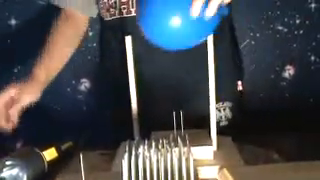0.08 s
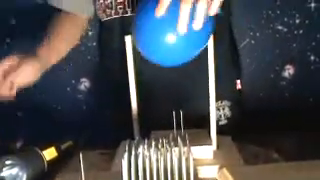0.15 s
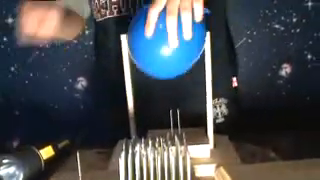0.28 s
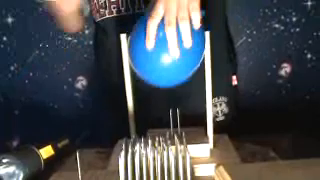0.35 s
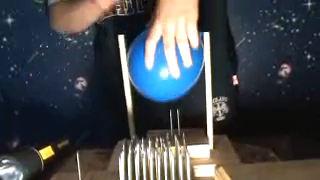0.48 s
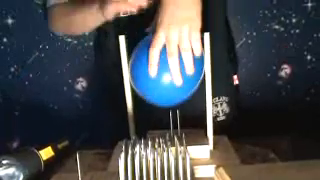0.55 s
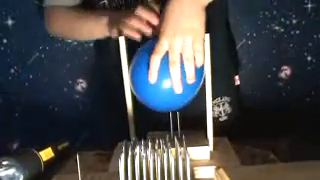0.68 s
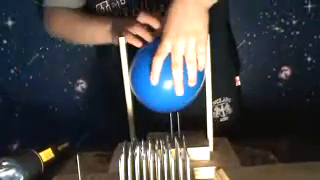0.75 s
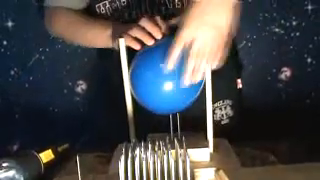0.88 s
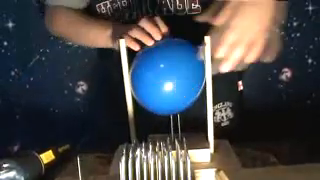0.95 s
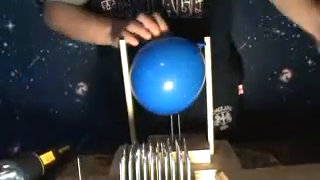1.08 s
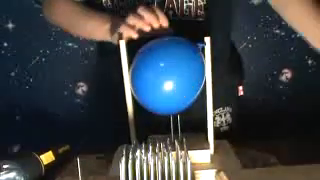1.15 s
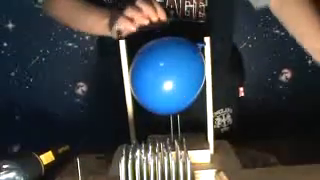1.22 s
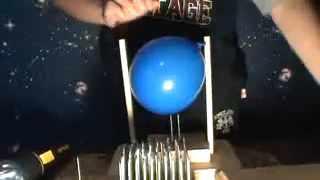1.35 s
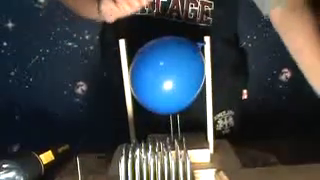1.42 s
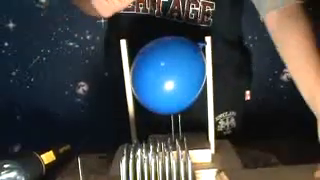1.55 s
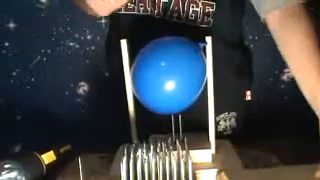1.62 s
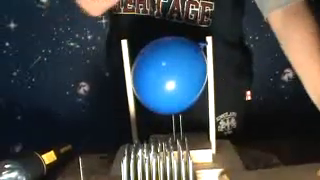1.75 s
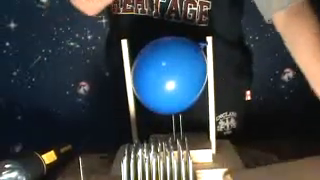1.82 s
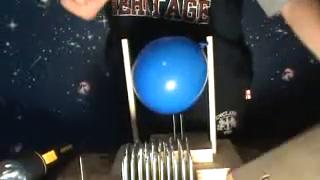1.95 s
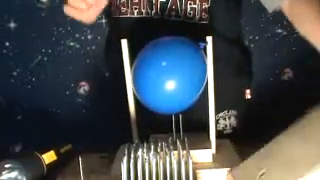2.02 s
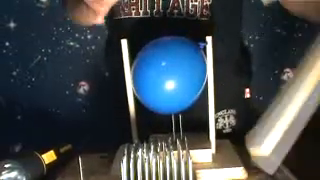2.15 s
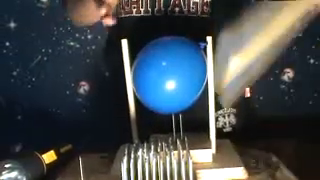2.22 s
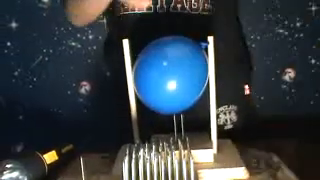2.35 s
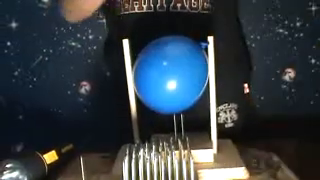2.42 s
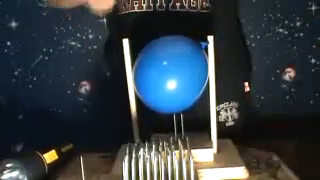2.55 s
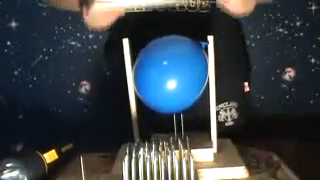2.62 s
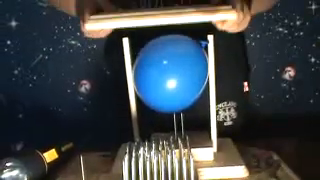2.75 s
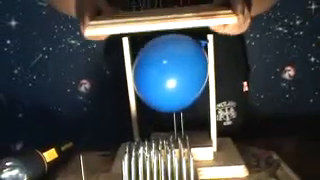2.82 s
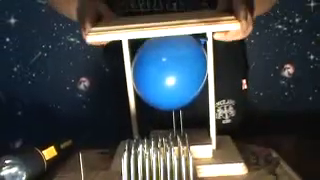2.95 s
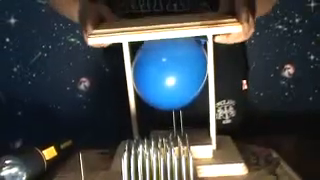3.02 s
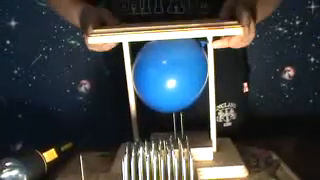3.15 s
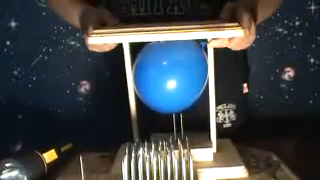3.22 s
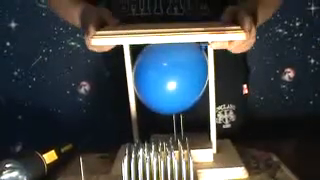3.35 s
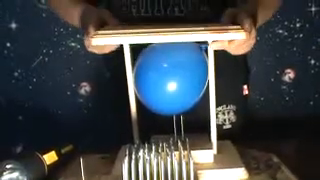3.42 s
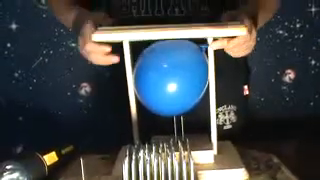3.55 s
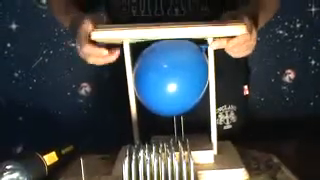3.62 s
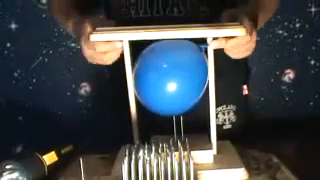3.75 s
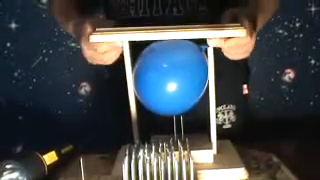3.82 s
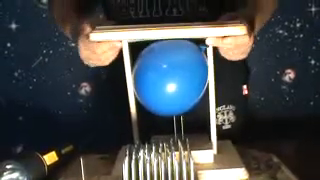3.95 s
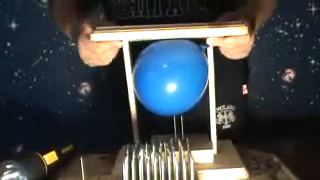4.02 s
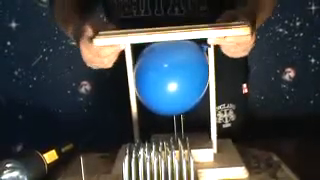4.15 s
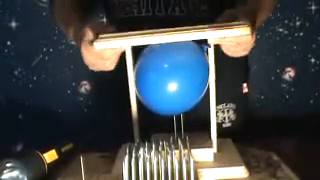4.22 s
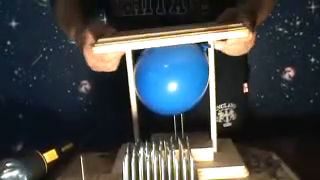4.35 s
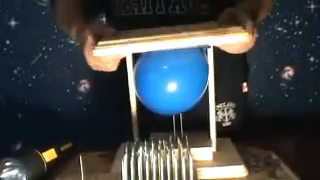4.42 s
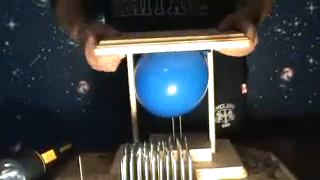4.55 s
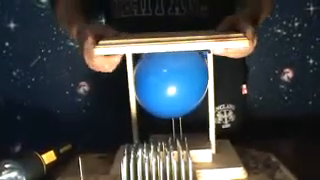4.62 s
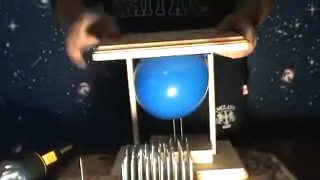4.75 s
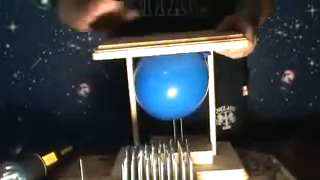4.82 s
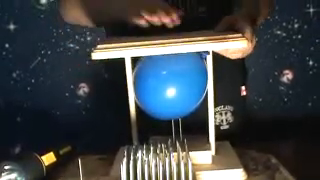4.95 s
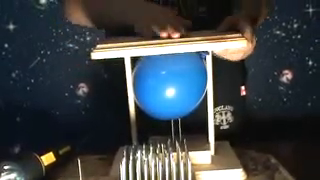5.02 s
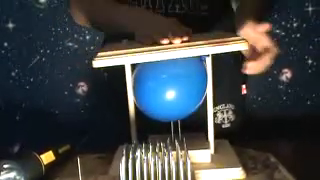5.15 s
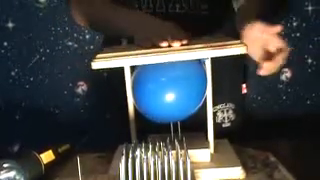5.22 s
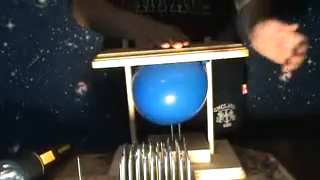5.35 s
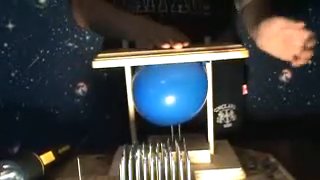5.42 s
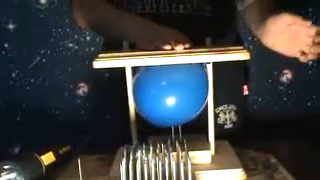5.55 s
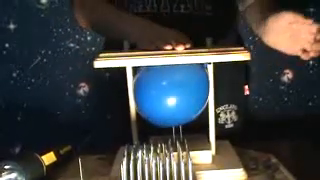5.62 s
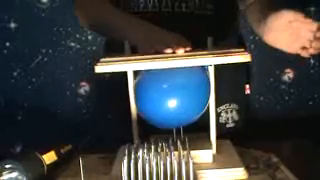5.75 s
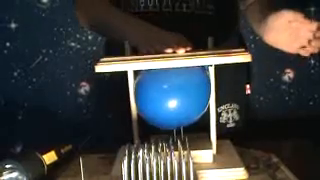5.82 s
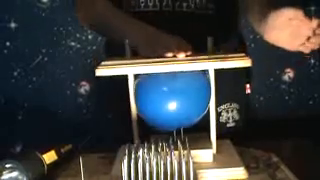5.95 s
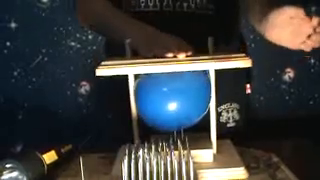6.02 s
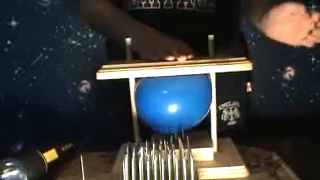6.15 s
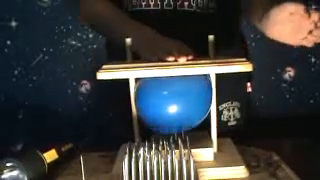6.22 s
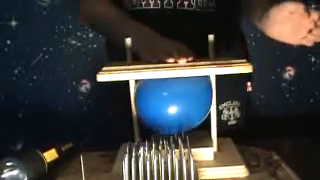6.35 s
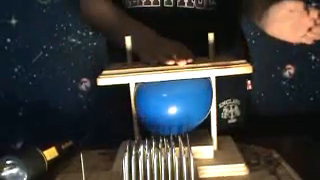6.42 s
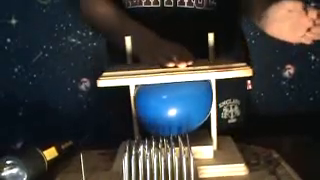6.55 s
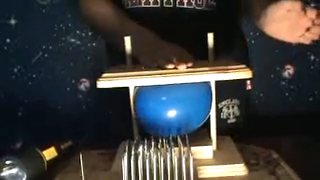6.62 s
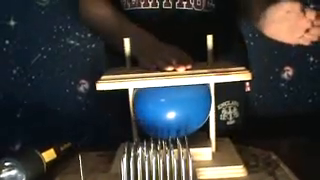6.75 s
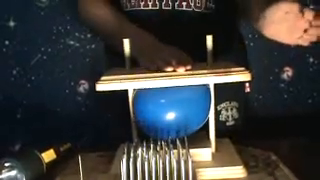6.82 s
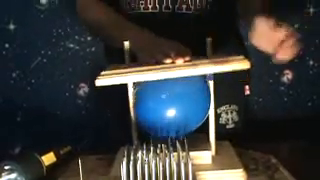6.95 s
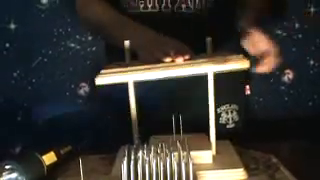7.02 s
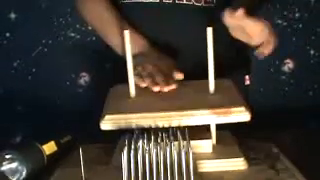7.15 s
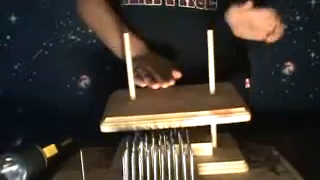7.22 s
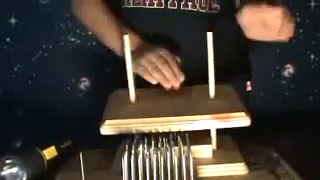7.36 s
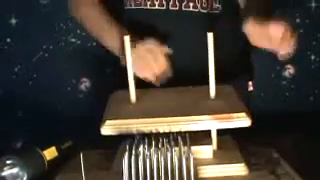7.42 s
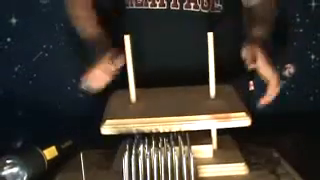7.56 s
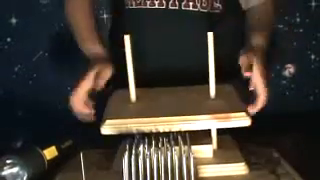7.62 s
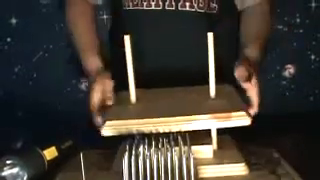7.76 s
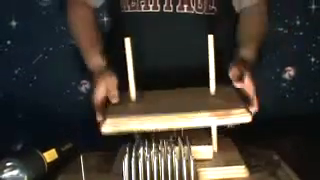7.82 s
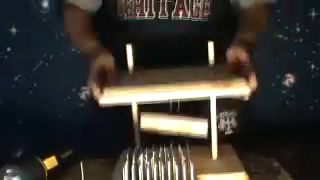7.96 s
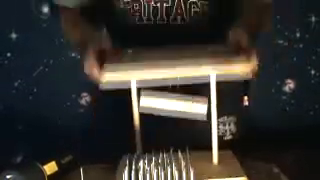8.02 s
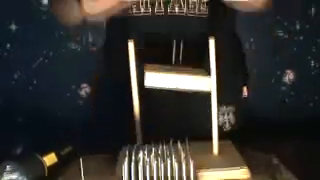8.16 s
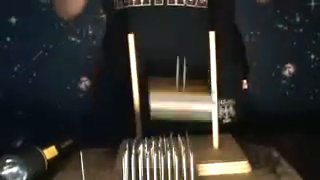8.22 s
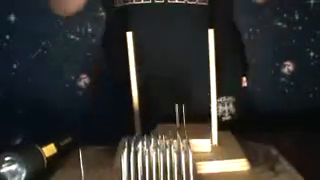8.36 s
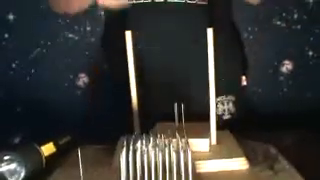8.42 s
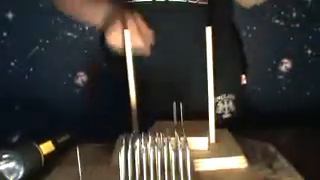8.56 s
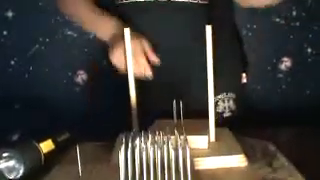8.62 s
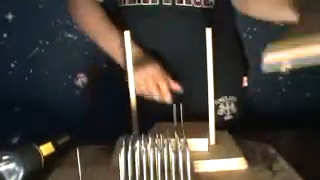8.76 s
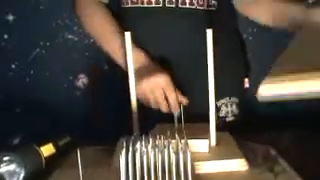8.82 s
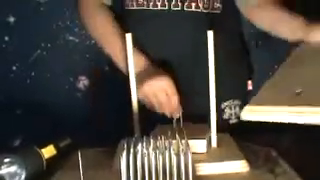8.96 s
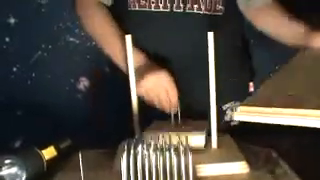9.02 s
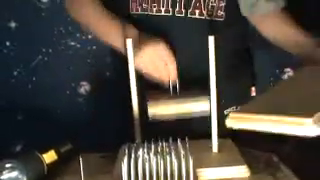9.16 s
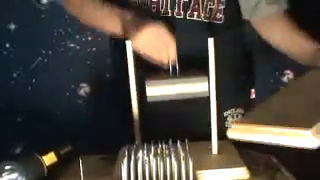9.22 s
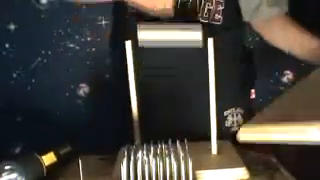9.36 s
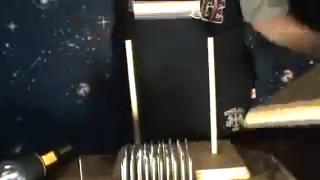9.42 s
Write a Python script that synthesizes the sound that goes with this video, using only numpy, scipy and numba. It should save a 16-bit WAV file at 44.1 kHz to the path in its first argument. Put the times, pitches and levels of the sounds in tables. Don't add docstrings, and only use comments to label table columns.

```python
import sys
import numpy as np
from scipy import signal
from scipy.fft import rfft, irfft, next_fast_len
from scipy.io import wavfile
from scipy.ndimage import uniform_filter1d, minimum_filter1d, map_coordinates
from numba import njit

SR = 44100
rng = np.random.default_rng(int(sys.argv[2]) if len(sys.argv) > 2 else 0)


def generate_wav(signal):
    frames = np.transpose(np.atleast_2d(signal))
    scaled = np.clip(frames, -1, 1) * 32767
    pcm = np.round(scaled).astype(np.int16)
    wavfile.write(sys.argv[1], SR, pcm)


def ratio_of_db(decibels):
    return 10 ** (np.asarray(decibels, float) / 20)


N = 418509

# (onset dB/s, release dB/s)
FINGER, DRAG, GROPE, CRASH = (980, 230), (790, 600), (110, 156), (12000, 1400)
SNAG = (5000, 880)
SING_EDGES = (2500, 700)


def unit(x):
    return x / np.sqrt(np.mean(x ** 2) + 1e-20)


def along(points, hz):
    f, v = np.transpose(points)
    return np.interp(np.log(hz + 1), np.log(f + 1), v)


def filtered(x, response):
    n = x.shape[-1]
    m = next_fast_len(n + 8192)
    return irfft(rfft(x, m) * response(np.fft.rfftfreq(m, 1 / SR)), m)[..., :n]


def colour(x, spectrum):
    return unit(filtered(x, lambda hz: ratio_of_db(along(spectrum, hz))))


def resonance(hz, centre, width):
    return 1j * hz * width / (centre * centre - hz * hz + 1j * hz * width)


def pair(n, spectrum, alike):
    def shape(hz):
        turn = np.arccos(np.clip(along(alike, hz), -1, 1)) / 2
        return ratio_of_db(along(spectrum, hz)) * [np.cos(turn), np.sin(turn)]
    mid, side = filtered(rng.standard_normal((2, n)), shape)
    return unit(np.array([mid + side, mid - side]))


def gritty(rate, depth_db):
    knots = rng.standard_normal(int(N * rate / SR) + 4)
    swing_db = depth_db * map_coordinates(knots, [np.arange(N) * rate / SR])
    return unit(rng.standard_normal(N) * ratio_of_db(swing_db))


# frequency in Hz, time to fall by 60 dB in seconds.
ROOM = [(60, 0.46), (200, 0.33), (600, 0.46), (3000, 0.4), (8000, 0.36), (14000, 0.19)]
# frequency in Hz, likeness from 0 to 1.
ALIKE = [(60, 1), (300, 0.85), (1400, 0.64)]


def room(x, wet_db):
    hz, t, z = signal.stft(pair(SR * 3 // 4, [(30, 0)], ALIKE), SR, nperseg=256)
    decay = ratio_of_db(-60 * t / along(ROOM, hz)[:, None])
    tail = signal.istft(z * decay, SR, nperseg=256)[1]
    tail *= 1 - np.exp(-np.arange(tail.shape[1]) / SR / 0.00099)
    tail *= ratio_of_db(wet_db) / np.linalg.norm(tail[0])
    tail[:, 0] += 1
    return signal.fftconvolve(x[None], tail, axes=1)


def add(out, s, x):
    part = out[:, round(s * SR):][:, :x.shape[1]]
    part += x[:, :part.shape[1]]


def ring(hz, t60, attack):
    t = np.arange(SR // 3) / SR
    return np.sin(2 * np.pi * hz * t) * ratio_of_db(-60 * t / t60) * (1 - np.exp(-t / attack))


def puff(spectrum, length):
    t = np.arange(SR // 3) / SR
    noise = colour(rng.standard_normal(len(t)), spectrum)
    return noise * np.exp(-t / length) * (1 - np.exp(-t / 0.00079))


def chirp(hz):
    return ring(hz, .018, .0006)


def strokes(rows, hand):
    t, out = np.arange(N) / SR, 0
    onset, release = hand
    for s, length, swell_db, *dbs in rows:
        shape = swell_db * (np.clip((t - s) / length, 0, 1) - 1) - onset * np.maximum(s - t, 0)
        shape = shape - release * np.maximum(t - s - length, 0)
        out = out + ratio_of_db(np.c_[dbs]) * ratio_of_db(shape)
    return out


# frequency in Hz, level in dB.
CLICK = [(1500, -120), (2000, 6), (4000, -2.5), (8000, 0.5), (12000, -14), (16000, -6)]


def knocks(events, body, click_s, wet_db):
    out = np.zeros((2, N))
    for s, db, click_db, *shape in events:
        hit = body(s, click_db, *shape) + ratio_of_db(click_db) * puff(CLICK, click_s)
        add(out, s, room(ratio_of_db(db) * hit, wet_db))
    return out


def struck(spectrum):
    cep = irfft(np.log(ratio_of_db(along(spectrum, np.fft.rfftfreq(8192, 1 / SR))) + 1e-4))
    cep[1:4096] *= 2
    cep[4097:] = 0
    pulse = irfft(np.exp(rfft(cep)))[:4096]
    return pulse / np.linalg.norm(pulse)


def blasts(blows, tone):
    out = np.zeros((2, N))
    for s, db in blows:
        add(out, s, room(ratio_of_db(db - 18) * struck(tone), wet_db=18))
    return out


def wood_on_wood(rows, hand, spectrum, peaks):
    def board(hz):
        total = 0
        for k, (centre, width, db) in enumerate(peaks):
            total = total + (-1) ** k * ratio_of_db(db) * resonance(hz, centre, width)
        return total
    hiss, tone = strokes(rows, hand)
    grit = gritty(300, depth_db=2.6)
    return hiss * colour(grit, spectrum) + tone * unit(filtered(grit, board))


# frequency in Hz, level in dB per Hz.
HISS = [(22, -30), (36, -1.5), (50, 4), (70, -2), (181, -6), (227, -5.5), (284, -9), (397, -3.5),
        (524, -11), (843, -6.5), (942, -10.5), (2180, -9.5), (2500, -8.5), (5780, -13.5), (10400, -21),
        (15800, -24.5)]
# frequency in Hz, likeness from 0 to 1.
HISS_ALIKE = [(40, 1), (300, 0.83), (1500, 0.044)]
# frequency in Hz, level in dB rms.
WHINE = [(15680, -83)]


def hiss_and_whine():
    (hz, db), = WHINE
    narrow = [(hz - 150, -60), (hz - 60, 0), (hz + 60, 0), (hz + 150, -60)]
    return ratio_of_db(db) * pair(N, narrow, [(hz, 1)]) + ratio_of_db(-57) * pair(N, HISS, HISS_ALIKE)


# start in seconds, length in seconds, swell in dB,
# body level at the end in dB, squeak level at the end in dB.
RUB = [(0.0, 0.0088, 2.5, -50.5, -53), (.03, 0.17, 9.5, -49, -62), (.3, 0.029, -3.5, -54.5, -70.5),
       (.59, 0.04, -4, -56.5, -57.5), (.645, 0.094, 0, -48, -57.5), (.745, 0.27, 7.5, -45, -62.5),
       (1.06, 0.082, 12, -54, -62.5), (1.272, 0.015, -2.5, -49, -46)]
# frequency in Hz, level in dB per Hz.
SKIN = [(35, -29), (60, -10), (286, -3.5), (435, -8.5), (559, -5), (776, -11.5), (1400, -18), (2110, -25.5),
        (2500, -26.5), (3250, -26), (5500, -120)]
# frequency in Hz, level in dB per Hz.
GRAIN = [(1060, -39), (1800, -3.5), (2170, -10.5), (2400, -6), (3090, -5), (3440, -3), (6130, -13),
         (7820, -7), (8710, -15.5), (15500, -30)]


def rubbing():
    body, squeak = strokes(RUB, FINGER)
    return body * colour(gritty(60, depth_db=2), SKIN) + squeak * colour(gritty(200, depth_db=3), GRAIN)


# start in seconds, peak in dB, click in dB, low tone in dB, pitch in Hz.
TAPS = [(0.348, -27.5, -17.5, -31, 250), (0.411, -28, -15.5, -17, 230), (.443, -36.5, -25, -16, 210),
        (0.55, -26.5, -15.5, -44, 250), (0.656, -36.5, -23, -12, 556), (0.789, -39, -10, -10, 190),
        (1.011, -28.5, -26.5, -24, 561), (1.119, -41.5, 1.5, -22, 700), (1.167, -32.5, -24, -35, 212),
        (1.27, -35, -4, -31, 567)]


def tap(s, click_db, low_db, hz):
    skin = .5 * ring(hz, 0.085, 0.002) + .2 * ring(2.1 * hz, 0.038, 0.0013)
    air = ratio_of_db(low_db + 6.5) * ring(154, 0.052, 0.0013)
    return skin + air + ratio_of_db(-9.0) * puff(SKIN, 0.014)


# start in seconds, length in seconds, swell in dB,
# level in dB, pitch in Hz.
SINGS = [(2.31, .015, -4, -60, 750), (1.954, .028, -9, -50, 1260), (2.05, .1, -1, -64, 3450),
         (2.05, .07, -6, -61, 4650), (2.055, .075, 5, -54, 6900), (2.057, .05, 0, -53, 7900),
         (2.19, .04, -2, -54, 6900), (2.2, .04, -2, -53, 7900), (2.216, .055, 9, -53, 3450),
         (2.215, .07, 0, -57, 1610), (2.255, .015, 1, -52, 2200), (2.25, .053, 6, -55, 1220),
         (2.257, .035, 0, -56, 545), (2.115, .03, 0, -61, 1180), (1.955, .03, -6, -54, 1410),
         (1.953, .04, -8, -49, 495), (4.65, .065, 4, -67, 4150), (8.13, .07, 0, -61, 393),
         (8.172, .045, -1, -51, 2310), (8.222, .033, 8, -47, 2260), (8.229, .045, 0, -46, 760),
         (8.245, .025, -1, -49, 1230), (8.28, .02, -2, -47, 520), (8.28, .025, 4, -45, 1370),
         (8.278, .028, 5, -45, 1170), (8.222, .073, 1, -55, 4250), (8.16, .05, 2, -60, 6700),
         (8.29, .015, 3, -49, 2650), (8.462, .012, 0, -51, 1150), (8.462, .012, 0, -51, 4300),
         (8.462, .006, 0, -54, 300), (8.31, .02, -2, -48, 127), (.7, .055, 2, -53, 570),
         (3.85, .11, 3, -58, 130), (5.315, .025, 0, -58, 1190), (6.13, .045, -3, -55, 250),
         (6.525, .05, -4, -55, 270)]


def singing():
    out = np.zeros((1, N))
    for s, length, swell_db, db, hz in SINGS:
        start = round((s - .05) * SR)
        noise, width = rng.standard_normal(SR // 2), hz / 32
        tone = unit(filtered(noise, lambda f: resonance(f, hz, width)))
        tone = unit(tone + 1.1 * np.sin(2 * np.pi * hz * np.arange(len(tone)) / SR))
        here = slice(start, start + len(tone))
        out[0, here] += strokes([(s, length, swell_db, db)], SING_EDGES)[0, here] * tone
    return out[0]


# start in seconds, length in seconds, swell in dB,
# body level in dB, squeak level in dB.
WEDGE = [(.98, 0.03, -2, -40, -47), (1.011, 0.026, -1, -37, -53)]
# frequency in Hz, level in dB per Hz.
WEDGED = [(47, -42.5), (80, -17), (363, -9), (419, -13), (610, 1.5), (1050, -18), (1390, -12.5),
          (2500, -22.5), (3250, -34), (5500, -120)]


def wedging():
    body, squeak = strokes(WEDGE, SNAG)
    skin = body * colour(gritty(100, depth_db=-2.5), WEDGED)
    return skin + squeak * colour(gritty(300, depth_db=5.5), GRAIN)


# start in seconds, peak in dB, click in dB, pitch in Hz, click pitch in Hz.
TICKS = [(1.617, -57.5, 10, 670, 2760), (1.858, -49.5, -4.5, 980, 1970), (1.952, -41.5, -2.5, 500, 2080),
         (1.973, -44.5, -13, 460, 3480), (2.579, -48.5, 1, 1190, 3600), (3.148, -59.5, 11, 766, 4160),
         (5.27, -56, 6.5, 1190, 2160), (7.818, -52, 5.5, 384, 3740), (8.122, -47.5, -41, 398, 4100)]
# frequency in Hz, level in dB per Hz.
KNOCK = [(88, -41.5), (150, -2.5), (266, 0.5), (378, -5.5), (530, -1.5), (753, -9), (1030, -8.5),
         (1640, -18), (5000, -31), (6500, -105), (11000, -120)]


def tick(s, click_db, hz, click_hz):
    bending = 0.67 * ring(hz, 0.076, 0.00041) + 0.45 * ring(2.6 * hz, 0.018, 0.00042)
    body = bending + ratio_of_db(-4.5) * puff(KNOCK, 0.02)
    return body + ratio_of_db(-33) * ring(206, 0.13, .001) + ratio_of_db(click_db + 5.0) * chirp(click_hz)


# start in seconds, length in seconds, swell in dB, hiss in dB, board tone in dB.
SLIDE = [(1.975, 0.017, -7, -49.5, -52.5), (2.0, 0.032, 3, -52, -65), (2.045, 0.084, 0, -51.5, -62.5),
         (2.14, 0.033, 2, -52, -66), (2.19, 0.068, 7, -42, -52), (2.28, 0.013, -5, -52, -59),
         (2.56, 0.037, 13, -51.5, -61), (2.6, 0.082, -15.5, -58, -64.5), (2.71, 0.045, -3, -58.5, -61.5),
         (3.13, 0.018, 13, -53, -61), (3.18, 0.045, 4, -72, -73), (4.64, 0.052, 0, -58, -62.5),
         (5.26, 0.071, 4.5, -55.5, -58), (7.09, 0.1, 6, -48.5, -49)]
# frequency in Hz, width in Hz, level in dB.
PLANK = [(511, 31, -2.5), (726, 26, -2), (1148, 220, -3.5), (1384, 64, -10.5), (2190, 70, -7.5)]


def sliding():
    return wood_on_wood(SLIDE, DRAG, GRAIN, PLANK)


# start in seconds, peak in dB, click in dB, pitch in Hz.
BUMPS = [(3.248, -39.5, -38, 223), (3.526, -42.5, -13, 137), (3.869, -56, -8, 130), (4.0, -42, -10, 143),
         (4.018, -41.5, -11, 217), (4.122, -47.5, -7.5, 90), (4.238, -40, -12.5, 190),
         (4.326, -40, -11, 110), (4.535, -58, 3.5, 179), (4.621, -44.5, -11.5, 207), (4.738, -48, -9, 200),
         (4.888, -48.5, -10, 147), (8.001, -46.5, -13.5, 116), (8.317, -53.5, -11.5, 127)]
# frequency in Hz, level in dB per Hz.
FRAME = [(24, -48.5), (40, -23), (81, -4.5), (204, -3.5), (259, -6.5), (397, -9.5), (440, -19), (569, -13),
         (1090, -25), (2400, -30), (3120, -46), (5280, -120)]


def bump(s, click_db, hz):
    return 0.87 * ring(hz, 0.09, 0.0016) + ratio_of_db(-5) * ring(85, 0.15, 0.006) + ratio_of_db(-6.5) * puff(FRAME, 0.021)


# start in seconds, length in seconds, swell in dB, rumble in dB.
FUMBLE = [(3.43, 0.12, 16, -50.5), (4.0, 0.377, 27, -47.5), (4.46, 0.18, 13.5, -48)]


def fumbling():
    return strokes(FUMBLE, GROPE)[0] * colour(gritty(25, depth_db=3), FRAME)


# time in seconds, pitch in Hz, level in dB.
SQUEAK = [(3.64, 4400, -78), (3.68, 4480, -61), (3.77, 4850, -58.5), (3.81, 5200, -70)]


def post_squeak():
    t = np.arange(N) / SR
    s, hz, db = np.transpose(SQUEAK)
    level = ratio_of_db(np.interp(t, s, db, -140, -140))
    return level * np.sin(2 * np.pi * np.cumsum(np.interp(t, s, hz)) / SR)


# start in seconds, peak in dB, pitch in Hz.
RIMS = [(3.998, -43, 4340), (4.019, -41, 2240), (4.02, -49, 4050), (4.033, -43, 4180), (4.117, -47, 1940),
        (4.121, -41.5, 3920), (4.233, -48, 3900), (4.294, -49, 4900), (4.323, -44, 4020),
        (4.327, -41.5, 1930), (4.535, -42.5, 4600), (4.625, -51, 4200), (4.888, -60, 2390),
        (8.127, -40.5, 2980), (8.126, -40, 3910), (8.227, -38, 4150)]


def rim_chirps():
    out = np.zeros((1, N))
    for s, db, hz in RIMS:
        add(out, s, ratio_of_db(db) * (ring(hz, 0.02, 0.00059) + 0.47 * puff(CLICK, 0.002))[None])
    return out[0]


# frequency in Hz, level in dB, time to fall by 60 dB in seconds.
BOARD = [(250, -4, 0.045), (298, -9, 0.094), (511, 4, 0.047), (600, 5.5, 0.029), (676, -2.5, 0.074),
         (790, -12, .05), (1057, -5.5, 0.028), (1190, -7, 0.027), (1360, -9.5, 0.03), (1760, -12, 0.025),
         (2280, -20, 0.018)]


def wood(scale, board_db):
    luck = rng.normal(0, 2.5, size=len(BOARD))
    return sum(ratio_of_db(board_db + db + d) * ring(hz * scale, t60, 0.0015) for (hz, db, t60), d in zip(BOARD, luck))


# start in seconds, peak in dB, click in dB, hum in dB,
# time for the hum to fall by 60 dB in seconds, time for it to swing up in seconds.
SLIPS = [(5.353, -18.5, -23.5, -28.5, 0.32, .004), (5.413, -19.5, -22.5, -26, 0.16, .008),
         (5.721, -43.5, -7.5, -17.5, 0.3, .03), (5.886, -19, -22.5, -27.5, 0.33, .012),
         (6.128, -36.5, -17, -9, 0.13, 0.023), (6.296, -13, -28.5, -13, 0.12, 0.077),
         (6.523, -38.5, -20.5, -27, .2, .02), (6.599, -16.5, -26, -17.5, 0.26, .05),
         (6.68, -16, -28.5, -17.5, 0.14, 0.064), (6.947, -39.5, -41.5, -43, 0.22, .02)]


def slip(s, click_db, low_db, t60, swing_s):
    hz = 120 + 12 * (s - SLIPS[0][0])
    hum = ring(hz, t60, swing_s) + 0.18 * ring(1.06 * hz, t60, 0.024)
    hum = np.roll(hum, shift=200)
    return np.roll(wood(1, board_db=-18), shift=90) + ratio_of_db(-15.5) * puff(KNOCK, 0.018) + ratio_of_db(low_db + 11.5) * hum


# start in seconds, level in dB.
BURST = [
    (7.2428, 4),
    (7.2438, 29.5),
]
# frequency in Hz, level in dB per Hz.
BURST_TONE = [(24, -51.5), (40, -23.5), (230, -9), (268, -14.5), (344, -10), (431, -3), (553, -6),
              (1030, -10), (1750, -13), (7650, -25.5), (8890, -36), (11400, -28.5), (15800, -40)]


def burst():
    return blasts(BURST, BURST_TONE)


# start in seconds, level in dB.
JOLTS = [
    (7.247, -20),
    (7.381, -3),
]


def jolts():
    out = np.zeros((2, N))
    for s, db in JOLTS:
        add(out[:1], s, -ratio_of_db(db) * ring(55, 0.022, 0.0023)[None])
    return out


# start in seconds, length in seconds, swell in dB, hiss in dB, rattle in dB.
FALL = [(7.248, 0.104, 0.0014, -20.5, -10.5), (7.3, 0.071, 0, -30, -23.5)]
# frequency in Hz, level in dB per Hz.
RATTLE = [(170, -40), (240, 3), (290, 10), (345, 4.5), (420, -11), (500, 7), (620, 1.5), (800, -0.5),
          (950, -5.5), (1200, -45)]


def falling():
    hiss, rattle = strokes(FALL, CRASH)
    return hiss * pair(N, GRAIN, ALIKE) + rattle * pair(N, RATTLE, ALIKE)


# start in seconds, level in dB, crack in dB.
LANDING = [
    (7.373, 0, -11),
    (7.386, -2, -19.5),
    (7.421, -5, -20),
    (8.587, -16.5, -43.5),
]
# frequency in Hz, level in dB per Hz.
LANDING_TONE = [(40, -43), (300, 3.5), (1400, -30), (8000, -33), (16000, -44)]
# frequency in Hz, level in dB, time to fall by 60 dB in seconds.
RIG = [(55, -13, .06), (114, -3.5, 0.075), (140.8, -3, 0.17), (182, 0.5, 0.15), (212.2, -0.5, 0.16),
       (280, -6, 0.07)]


def landing():
    out = np.zeros((2, N))
    for s, db, crack_db in LANDING:
        boom = sum(ratio_of_db(level - 10.0) * ring(hz, t60, 0.0025) for hz, level, t60 in RIG)
        shake = room(ratio_of_db(db) * (boom + ratio_of_db(crack_db) * puff(LANDING_TONE, 0.01)), wet_db=-9)
        add(out[:1], s + 0.00087, 1.16 * shake[:1])
        add(out[1:], s, shake[1:])
    return out


# start in seconds, length in seconds, swell in dB, hiss in dB, board tone in dB.
LIFT = [(8.03, 0.12, 11, -56, -74), (8.128, 0.095, 5, -45, -54), (8.228, 0.05, 5.5, -41.5, -50),
        (8.28, .025, 6, -39, -50), (8.461, 0.015, 1.5, -40, -55)]
# frequency in Hz, level in dB per Hz.
POSTS = [(700, -12.5), (1800, -12), (2250, -12.5), (2700, -13), (3630, -15.5), (4400, -8), (5030, -33),
         (6300, -23), (7000, -16.5), (8030, -16.5), (8710, -22), (9280, -28), (15500, -33.5)]
# frequency in Hz, width in Hz, level in dB.
HOLES = [(493, 44, 1), (763, 36, 3.5), (1350, 43, -0.5), (2260, 80, -7), (2710, 30, -13)]


def lifting():
    return wood_on_wood(LIFT, SNAG, POSTS, HOLES)


# start in seconds, level in dB.
BLOCK = [(8.519, 7.8), (8.5205, 14.7), (8.527, 18), (8.538, 11.4), (8.549, 11.5), (8.571, 11), (8.577, 7.9),
         (8.596, 5.5), (8.612, 1.7)]
# frequency in Hz, level in dB per Hz.
BLOCK_TONE = [(29, -75.5), (50, -48.5), (128, -17), (290, -6.5), (352, -7.5), (597, -3), (1390, -4),
              (1600, -6.5), (2140, -3), (4300, -7.5), (5600, -18.5), (7490, -18.5), (9000, -30),
              (11800, -47), (12700, -68.5), (15800, -61)]
# frequency in Hz, level in dB, time to fall by 60 dB in seconds.
BLOCK_MODES = [(307, -5.5, .1), (488, -7, 0.1), (762, -3, 0.075), (1207, -6.5, 0.074), (1722, -6.5, .1),
               (1864, -6.5, .1), (2143, -2, 0.18), (2530, -8, 0.12), (3178, -4.5, 0.13), (3420, -1.5, 0.17),
               (3780, -10, .08), (4340, -7, 0.088)]
# start in seconds, level in dB, pitch in Hz,
# time to fall by 60 dB in seconds.
FACES = [(8.527, -3, 3200, 0.018), (8.528, -6.5, 2300, 0.018), (8.546, -8.5, 760, 0.054),
         (8.538, -9, 3000, .02), (8.575, -9, 1300, 0.035)]
# start in seconds, length in seconds, swell in dB, level in dB.
TUMBLE = [(8.53, 0.1, -1, -30)]
# frequency in Hz, level in dB per Hz.
NAILS = [(1500, -58), (2200, 3.5), (3000, 21.5), (4200, 15.5), (5200, -10), (8000, -32), (11800, -5),
         (12300, -59)]


def block_fall():
    out = blasts(BLOCK, BLOCK_TONE)
    for s, db in BLOCK[2:]:
        bell = sum(ratio_of_db(level + rng.normal(0, 4.3)) * ring(hz, t60, 0.00059) for hz, level, t60 in BLOCK_MODES)
        add(out, s, room(ratio_of_db(db - 39) * bell, wet_db=-3))
    snap = puff(CLICK[:4] + [(11800, -16.5), (12300, -20)], 0.0045)
    add(out, BLOCK[2][0], room(ratio_of_db(-11.0) * snap, wet_db=-1.5))
    for s, db, hz, t60 in FACES:
        add(out, s, room(ratio_of_db(db) * ring(hz, t60, 0.00044), wet_db=-7))
    return out + strokes(TUMBLE, CRASH) * pair(N, NAILS, ALIKE)


# frequency in Hz, level in dB, time to fall by 60 dB in seconds.
SETDOWN = [
    (9.1505, -34.5, -13.5, [(318, 0, .13), (690, -9, 0.086), (950, -12, 0.045), (477, -11.5, 0.058), (1400, -13, .012)]),
    (9.2335, -31.5, -8.5, [(215, -6.5, 0.17), (290, -2, 0.081), (347, -1.5, .07), (600, -3, 0.11), (1200, -4, .04), (1875, -10, 0.081), (2950, -9, .02), (480, -7, 0.086), (900, -4.5, 0.032), (1500, -10, 0.021), (2310, -15, 0.023)]),
]


def set_down(s, click_db, modes):
    return sum(ratio_of_db(db) * ring(hz, t60, .0008) for hz, db, t60 in modes)


def scene():
    out = hiss_and_whine()
    out += knocks(TAPS, tap, click_s=0.0039, wet_db=-3.5)
    out += knocks(TICKS, tick, click_s=0.0057, wet_db=-11.0)
    out += knocks(BUMPS, bump, click_s=0.0078, wet_db=-3.0)
    out += knocks(SLIPS, slip, click_s=0.0051, wet_db=-5)
    friction = rubbing() + wedging() + sliding() + fumbling() + post_squeak() + lifting()
    out += ratio_of_db(-3.5) * room(friction, wet_db=-9.0)[:, :N]
    out += room(singing() + rim_chirps(), wet_db=-14.0)[:, :N]
    out += burst() + jolts() + falling() + landing() + block_fall()
    return out + knocks(SETDOWN, set_down, click_s=0.0053, wet_db=-8)


@njit
def follow(size, fall):
    out, level = np.empty_like(size), 0.0
    for i in range(len(size)):
        level = max(size[i], level * fall)
        out[i] = level
    return out


def gain_control(x, top_db, release_db_s, slope):
    level = follow(np.abs(x).max(axis=0), float(ratio_of_db(-release_db_s / SR)))
    need = np.maximum(level / ratio_of_db(top_db), 1) ** -np.clip(slope, 0, 1)
    return x * uniform_filter1d(minimum_filter1d(need, size=161), size=81)


# frequency in Hz, lead in radians.
PORTS = [(0, 0.1), (260, -0.036), (860, -0.93), (1810, -0.62), (2500, -0.79), (16500, 0.5)]


def two_ports(x):
    def response(hz):
        return ratio_of_db([[-.2], [.2]]) * np.exp(.5j * along(PORTS, hz) * [[1], [-1]])
    return filtered(x, response)


# frequency in Hz, threshold in dB against the band's usual level.
DROP = [(1000, -40), (1200, -5), (1400, -3), (1620, -.8), (1950, -4.2), (2250, -2.3), (2700, -3.6),
        (4950, -3), (5120, -1), (5300, -2.8), (6000, -2.2), (6250, -1), (6500, -2.8), (8400, -2.6),
        (9000, -6)]
# frequency in Hz, threshold in dB against the middle.
MASKED = [(4800, -60), (5800, -17), (6300, -13), (8500, -18), (9000, -60)]


def thin_bands(x):
    hz, _, z = signal.stft(x, SR, nperseg=1024)
    band = uniform_filter1d(uniform_filter1d(np.abs(z) ** 2, size=3, axis=0), size=9, axis=1)
    band = band[np.minimum(np.arange(len(hz)) // 3 * 3 + 1, len(hz) - 1), :-8]
    weak = band < ratio_of_db(2 * along(DROP, hz))[:, None] * np.median(band, axis=1, keepdims=True)
    presence = band[(hz > 1500) & (hz < 4000)].mean(axis=0)
    luck, (row, frame) = rng.standard_normal(band.shape), np.indices(band.shape)
    weak |= band < ratio_of_db(2 * along(MASKED, hz)[:, None] + 7 * luck[row // 4, frame // 9]) * presence
    loud = presence > ratio_of_db(2 * 34) * np.median(presence)
    top = (hz > 12100)[:, None] & (band < ratio_of_db(2 * -30) * presence)
    unlucky = luck[row // 24 + 200, frame // 4] < .1
    weak |= top & loud & np.roll(loud, shift=3) & unlucky
    z[:, :-8] *= np.where(weak, .045, 1)
    return signal.istft(z, SR, nperseg=1024)[1][:N]


def band_limit(x):
    return signal.sosfilt(signal.butter(12, 16850, fs=SR, output="sos"), x)


def record(dry):
    loud = gain_control(dry, top_db=-4.0, release_db_s=253.0, slope=0.98)
    left, right = two_ports(loud)
    gap = lambda hz: (1 - 1.1 * np.exp(-((hz - 8650) / 130) ** 4)) * (hz < 15830)
    mid = filtered((left + right) / 2, gap)
    side = filtered((left - right) / 2, lambda hz: np.where(hz < 2600, 1, .09))
    return band_limit(thin_bands(mid) + [side, -side])


dry = scene()
out = record(dry)
generate_wav(out)
```